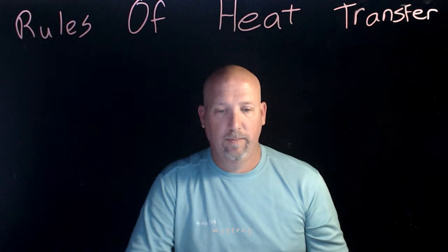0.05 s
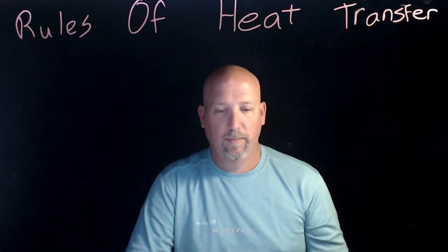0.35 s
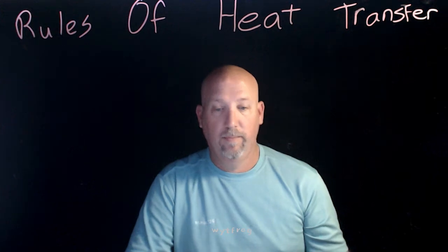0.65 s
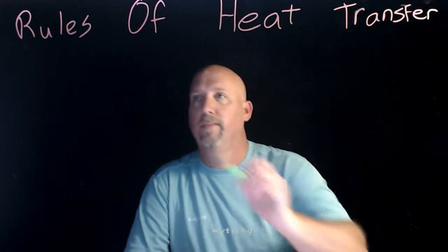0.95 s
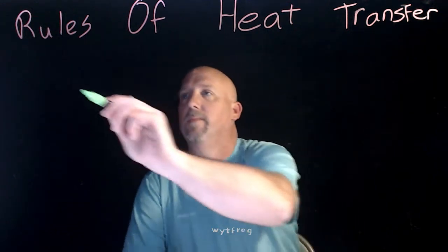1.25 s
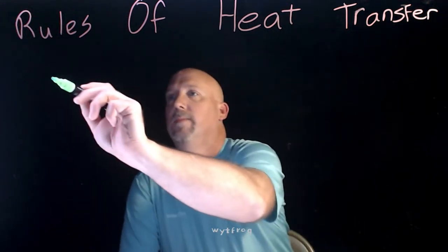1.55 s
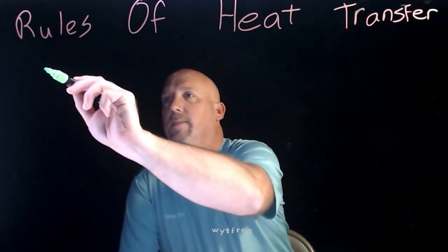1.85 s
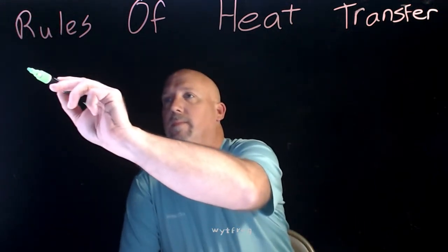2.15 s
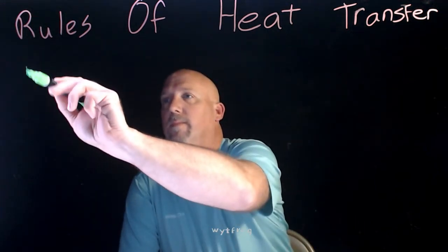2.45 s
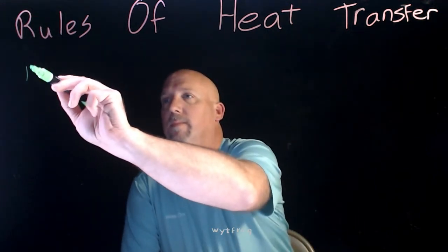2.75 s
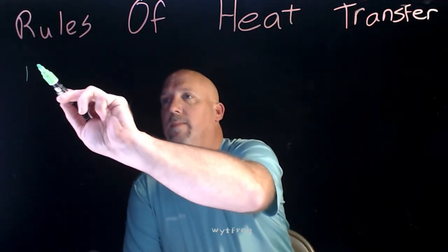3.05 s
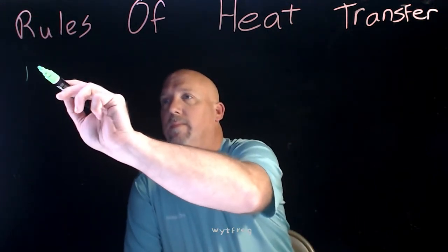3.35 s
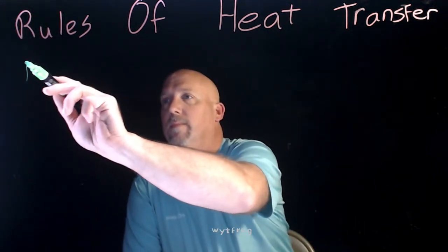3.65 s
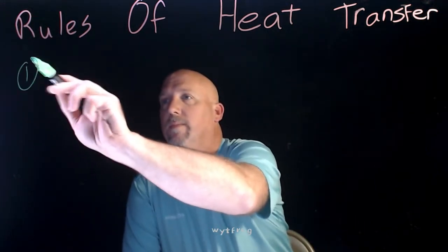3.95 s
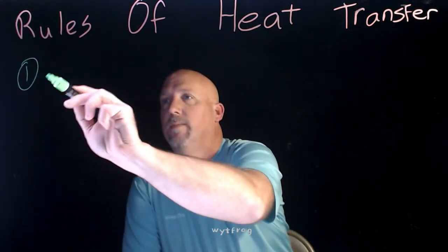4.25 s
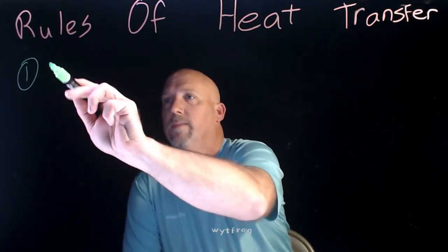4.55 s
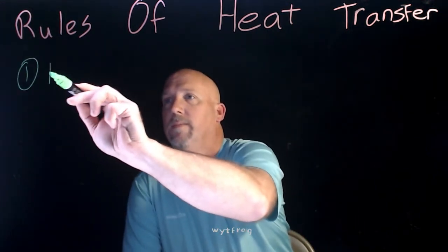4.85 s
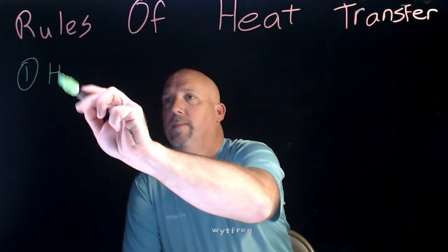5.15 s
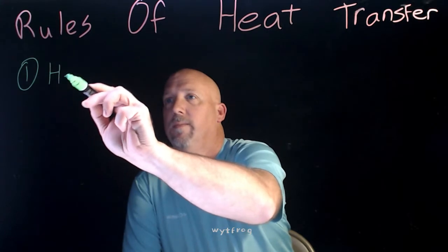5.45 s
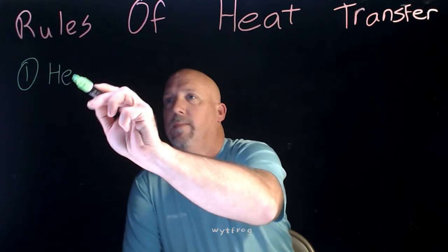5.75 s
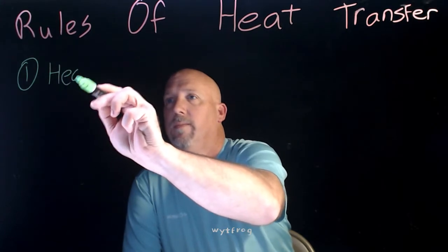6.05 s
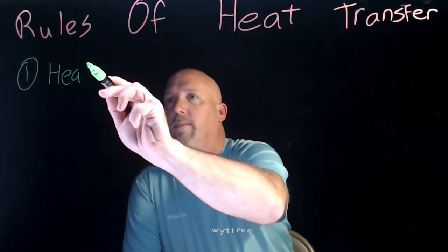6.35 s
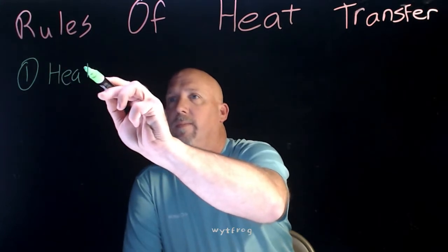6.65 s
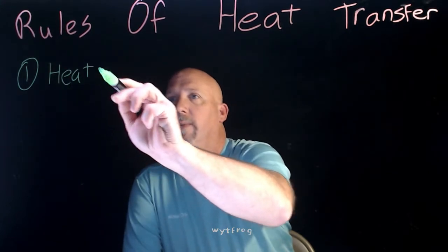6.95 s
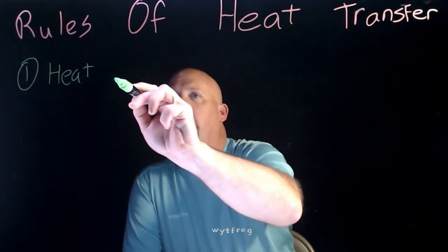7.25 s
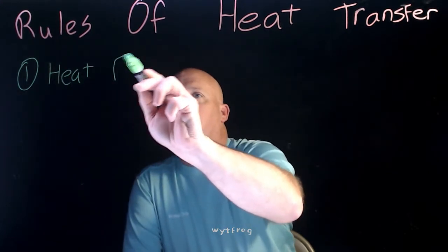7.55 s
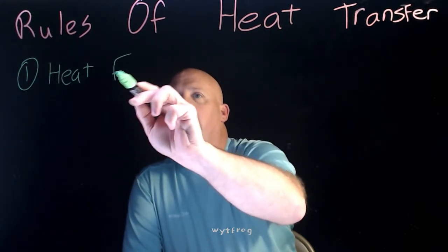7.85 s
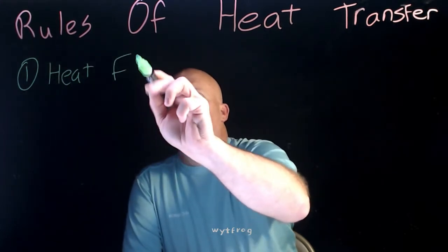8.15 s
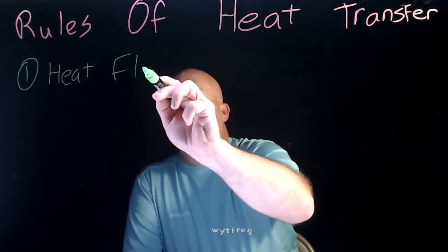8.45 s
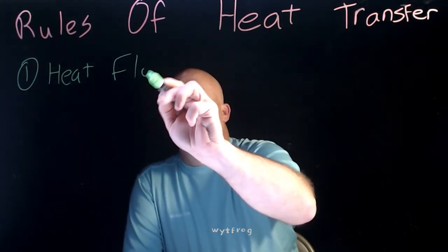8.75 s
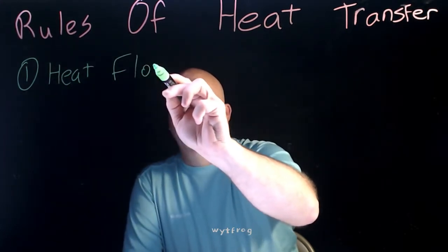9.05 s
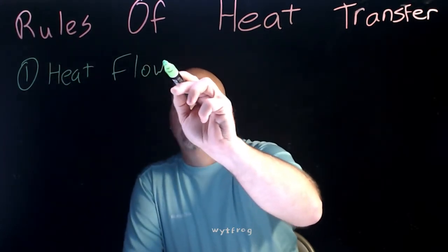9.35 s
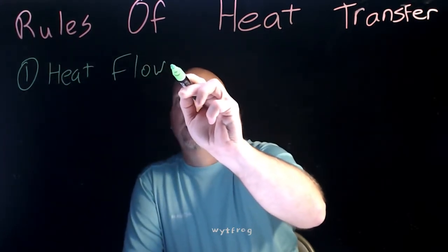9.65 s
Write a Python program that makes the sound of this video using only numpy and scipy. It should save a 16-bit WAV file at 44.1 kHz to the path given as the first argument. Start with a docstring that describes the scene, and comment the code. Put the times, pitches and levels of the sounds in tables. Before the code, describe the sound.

A marker writes on a big glass pane, heard up close in a small studio. First comes a low, soft bump against the board, then a knock and a few very short, high squeaks. A plastic cap drops with a hard clack and quickly rattles to rest. The felt tip then taps the glass about twice a second, squeaking briefly once more. A steady low hum and light hiss lie underneath.

```python
"""Marker on a glass board

In a small, dry studio with a mains hum, a hand bumps a large framed glass board and writes on it.
The felt tip lands with dull knocks that ring the pane, then sticks and slips in a few tiny squeaks.
Something small and plastic, probably the cap, falls and bounces.
A mild noise gate lifts the hiss after each loud sound."""
import sys
import numpy as np
from scipy import signal
from scipy.fft import rfft, irfft
from scipy.io import wavfile
from scipy.ndimage import uniform_filter1d

SR = 44100
rng = np.random.default_rng(int(sys.argv[2]) if len(sys.argv) > 2 else 0)


def wrap_up_sound(samples):
    """Save the sound to the file named by the first command line argument, as 16-bit audio."""
    columns = np.atleast_2d(samples).T
    # keep every value between -1 and 1, then stretch to whole-number steps
    tamed = np.clip(columns, -1, 1)
    steps = np.round(tamed * 32767).astype(np.int16)
    wavfile.write(sys.argv[1], SR, steps)


N = 436149
AGE = np.arange(SR) / SR  # time [s] within a one-second sound
HZ = np.fft.rfftfreq(SR, 1 / SR)


def amp(db):
    """Decibels to gain."""
    return 10 ** (np.asarray(db) / 20)


def unit(x):
    """Scales to an rms of one."""
    return x / np.sqrt(np.mean(x ** 2) + 1e-20)


def curve(points, hz):
    """Reads a breakpoint curve on a log-frequency axis."""
    freqs, values = np.transpose(points)
    return np.interp(np.log(hz + 1), np.log(freqs), values)


def add(mix, start, sound):
    """Drops a sound into the mix at a time in seconds."""
    part = mix[max(round(start * SR), 0):][:len(sound)]
    part += sound[:len(part)]


def decay(t60, age=AGE):
    """An envelope that falls 60 dB in t60 seconds."""
    return np.exp(-np.log(1000) * age / t60)


def mode(hz, db, t60):
    """One struck, dying sine."""
    return amp(db) * decay(t60) * np.sin(2 * np.pi * hz * AGE)


def band(hz, octaves):
    """One second of noise around a frequency."""
    bell = np.exp(-.5 * (np.log2((HZ + 1) / hz) / octaves) ** 2)
    return unit(irfft(rfft(rng.standard_normal(SR)) * bell))


def echoes(rows):
    """Frequency response of the direct sound plus a few delayed copies."""
    return 1 + sum(gain * np.exp(-2j * np.pi * HZ * delay) for delay, gain in rows)


def chirp(swell_ms, sag, wobble):
    """Envelope and phase (in turns per Hz) of a slip that swells, sags in pitch and dies."""
    age = AGE * 1000 / swell_ms
    envelope = (age * np.exp(1 - age)) ** 2
    bend = 1 + sag * (np.exp(1 - age) - 1) / 2 + wobble * band(510, 0.96)
    return envelope, np.cumsum(bend) / SR


def clatter(spectrum, rattle, rattle_s):
    """The sharpest click with this spectrum (minimum phase), then a quick, irregular chatter."""
    log_gain = np.log(np.r_[spectrum, spectrum[-2:0:-1]] + 1e-6)
    click = np.fft.ifft(np.exp(np.conj(signal.hilbert(log_gain)))).real
    chatter = rattle * rng.standard_normal(SR) * np.exp(-AGE / rattle_s)
    return (click + signal.fftconvolve(click, chatter)[:SR]) / abs(click).max()


def rub(length, db, hz, octaves):
    """One soft swell of friction noise."""
    swell = np.hanning(min(int(length * SR), SR))
    return amp(db) * swell * band(hz, octaves)[:len(swell)]


# colour of the room air: (frequency [Hz], relative level [dB])
AIR_COLOUR = [(25, -11), (48, -13), (68, -0.5), (170, 6), (300, -1), (500, -4.5), (630, -11.5), (900, -1.5),
              (1250, -0.5), (2000, -4), (4000, -12.5), (7800, -24.5), (12000, -25.5), (14300, -22),
              (16000, -28.5)]
# hum partials: (harmonic number, rms level [dB])
HUM_PARTIALS = [(2, -52.5), (3, -76.5), (4, -76), (5, -81.5), (6, -84), (15, -86.5)]


def room_tone(air_db=-60.5, mains_hz=60, waver=0.036):
    """A bed of ventilation hiss and slightly wavering mains hum."""
    t = np.arange(N) / SR
    colour = amp(curve(AIR_COLOUR, np.fft.rfftfreq(N, 1 / SR)))
    air = unit(irfft(rfft(rng.standard_normal(N)) * colour, N))
    hum = sum(np.sqrt(2) * amp(db) * np.sin(2 * np.pi * (round(k) * mains_hz * t + rng.random()))
              for k, db in HUM_PARTIALS)
    drift = unit(sum(np.sin(2 * np.pi * (hz * t + rng.random())) for hz in np.geomspace(.3, 4, 12)))
    return amp(air_db) * air + hum * (1 + waver * drift)


# bending modes of the pane: (frequency [Hz], level [dB], t60 [s], polarity)
PANE_MODES = [(86.6, -17.5, 0.12, 1), (127.2, -14, 0.15, 1), (178.5, -0.9, 0.059, -1),
              (223.4, -6, 0.059, 1), (275.8, 3, 0.04, 1), (370.3, -12, 0.097, -1), (435, 1, 0.027, -1),
              (474, -26.5, 0.13, -1), (542, -28, 0.14, -1), (607, -40, .08, 1), (783, -18, 0.082, 1)]
# slap from the frame and nearby surfaces: (delay [s], gain)
FRAME_RETURNS = [(.00798, 0.46), (.00928, 0.11), (.01794, -0.24), (.0227, -.036), (.0307, -0.13)]
# knocks on the pane, the first two from the hand as the bump begins, the rest where the tip lands: (time [s],
# force [dB], contact [ms], lean towards the low modes, tick level [dB])
LANDINGS = [(1.2975, -22.5, 0.3, -0.1, -55), (1.302, -20, 0.78, -0.5, -56.5),
            (2.347, -11.5, 0.79, -1.2, -46), (3.6431, -18, .3, 2.2, -58), (3.665, -26.5, 0.26, 1.5, -48),
            (4.5333, -19, 0.68, -2, -55), (4.8339, -10, 0.47, -0.25, -42), (5.0836, -10.5, 0.29, 0.7, -41),
            (5.3759, -11, 0.74, -1.4, -51), (5.8864, -11.5, 0.7, -0.6, -50), (6.4426, -6.5, 0.44, 0.8, -46),
            (6.7363, -6.5, .54, 0.16, -35.5), (7.2908, -17.5, 0.38, 0.55, -45),
            (7.7763, -6.5, 0.22, 1.26, -18), (8.106, -10, 0.12, 1.63, -38.5),
            (8.5682, -39.5, 0.97, 2.5, -70), (9.0543, -11.5, 0.16, 1.63, -42)]


def pane_knocks(cancel_hz=60, felt_hz=700, pre_roll_s=.01):
    """The hand, then the felt tip, pushes the pane; a longer contact leaves the high modes quiet."""
    out = np.zeros(N)
    z = 1j * HZ / cancel_hz
    low_cut = z ** 2 / (z ** 2 + np.sqrt(2) * z + 1)  # the pane's front and back cancel in the deep bass
    felt = 1 / np.sqrt(1 + (HZ / felt_hz) ** 8)  # the soft nib rolls off the top
    colour = low_cut * felt * echoes(FRAME_RETURNS)
    for time, db, contact_ms, lean, _ in LANDINGS:
        # where the pane is struck decides how strongly the low modes speak
        ring = sum(np.sign(polarity) * (max(hz, 190) / 250) ** -lean * mode(hz, level, t60)
                   for hz, level, t60, polarity in PANE_MODES)
        push = np.exp(-.5 * (2 * np.pi * HZ * contact_ms / 1000) ** 2 - 2j * np.pi * HZ * pre_roll_s)
        add(out, time - pre_roll_s, amp(db) * irfft(rfft(ring) * push * colour))
    return out


# colour of the barrel's tick: (frequency [Hz], level [dB])
TICK_COLOUR = [(300, -17), (720, -11.5), (860, -0.5), (1250, -1.5), (1600, -20), (1950, -4.5), (2350, -6),
               (2800, -41), (3700, -30), (4200, -16.5), (5600, -20.5), (6500, -53.5), (17000, -60.5)]


def marker_ticks(chirp_hz=5385, chirp_db=-13):
    """The top layer of each knock: a tick (the barrel's, when the tip lands) and a brief high chirp."""
    out = np.zeros(N)
    colour = amp(curve(TICK_COLOUR, HZ))
    for time, *_, tick_db in LANDINGS:
        swell, turns = chirp(swell_ms=1.4, sag=0.015, wobble=0.01)
        add(out, time, amp(tick_db) * clatter(colour, rattle=0.03, rattle_s=0.0031))
        add(out, time, amp(tick_db + chirp_db) * swell * np.sin(2 * np.pi * chirp_hz * turns))
    return out


# the whole board swaying in its stand: (frequency [Hz], level [dB], t60 [s])
STAND_MODES = [(63, -36.5, 0.66), (96, -15.5, 0.136), (146, -41.5, 0.89), (184, -4.5, 0.11),
               (303, -18.5, 0.088), (379, -22.5, 0.1)]
# skin on glass: (length [s], level [dB], centre [Hz], width [octaves])
HAND_RUBS = [(.04, -45.5, 680, 0.44), (.074, -69, 5000, 0.7)]


def hand_bump(time=1.3055, attack_s=0.0059, rub_lag_s=.008):
    """A soft, slow blow sets the board and its stand booming, and the hand rubs the glass."""
    out = np.zeros(N)
    boom = sum(mode(*row) for row in STAND_MODES)
    add(out, time, boom * (1 - np.exp(-AGE / attack_s)))
    for length, db, hz, octaves in HAND_RUBS:
        add(out, time + rub_lag_s - length / 2, rub(length, db, hz, octaves))
    return out


# light brushes: (peak time [s], length [s], level [dB], centre [Hz], width [octaves])
SOFT_RUBS = [(2.974, 0.075, -63, 7500, 2.1), (3.388, 0.019, -56.5, 2330, .66),
             (3.979, .11, -52.5, 280, 0.454), (7.071, 0.12, -64.5, 3500, 0.55),
             (9.3, 0.54, -67, 212, 0.091)]


def brushes():
    """Nib and sleeve rub softly between the strokes."""
    out = np.zeros(N)
    for time, length, db, hz, octaves in SOFT_RUBS:
        add(out, time - length / 2, rub(length, db, hz, octaves))
    return out


# nib resonances stirred by a gritty slip: (frequency [Hz], level [dB])
NIB_MODES = [(1950, 3.5), (2550, -1), (3400, -7.5), (4600, -21), (6250, -22)]
# stick-slip squeaks, with grit and thud relative to the tone; the row at 7.001 s is a strong wall echo of the
# squeak at 6.99 s: (time [s], level [dB], pitch [Hz], swell [ms], overtone [Hz], grit [dB], thud [dB])
SLIPS = [(3.0707, -18, 2635, 2, 14940, -32, -14.5), (3.1640, -15.5, 2850, 3.1, 3800, -10, -32),
         (3.175, -16, 1710, 1.1, 7300, -9.5, -19.5), (3.1781, -13, 2190, 0.98, 4580, -13, -18),
         (6.4416, -34.5, 2700, 1.2, 5950, -19, -20), (6.7362, -41, 5990, 1.4, 2700, -24, -22),
         (6.9375, -49, 15400, .83, 11200, -20, -27), (6.944, -39.5, 4650, 1.6, 8200, -24, -27),
         (6.973, -39.5, 5150, 2.3, 8800, -5, -32), (6.9903, -17, 2430, 1.4, 8860, -12, -48),
         (6.9926, -21.5, 3620, 1.2, 9800, -12, -44), (7.001, -26.5, 3300, 2.3, 1970, -8, -43),
         (7.043, -38.5, 565, 1.54, 1090, -20, -26)]


def nib_squeaks(overtone_db=-19, hiss_db=-4):
    """The nib slips for a few milliseconds: an unsteady tone and overtone, grit and a small thud; one row
    replays a squeak as its wall echo."""
    out = np.zeros(N)
    for time, db, hz, swell_ms, overtone_hz, grit_db, thud_db in SLIPS:
        swell, turns = chirp(swell_ms, sag=0.033, wobble=0.013)
        phase = 2 * np.pi * turns
        tone = np.sin(hz * phase) + amp(overtone_db) * np.sin(overtone_hz * phase)
        nib_ring = sum(amp(level) * np.sin(nib_hz * phase) for nib_hz, level in NIB_MODES)
        grit = amp(hiss_db) * band(hz, octaves=0.38) + nib_ring
        thud = band(690, octaves=1.1)
        add(out, time, amp(db) * swell * (tone + amp(grit_db) * grit + amp(thud_db) * thud))
    return out


# colour of a clack: (frequency [Hz], level [dB])
CLACK_COLOUR = [(40, -46), (150, -10), (500, -14), (1000, 0), (1400, 7.5), (2000, -2.5), (3600, -12.5),
                (4500, -18), (7500, -33), (10500, -21), (12500, -27.5), (17000, -34.5)]
# ring of the cap: (frequency [Hz], level [dB], t60 [s])
CAP_MODES = [(788, -48, .21), (937, -47.5, .22), (1040, -39, 0.37), (1411, -41, .24), (1624, -37.5, .22),
             (2244, -42, .18), (5870, -44, 0.0613)]
# faint boom and wash after each bounce: (centre [Hz], width [octaves], level [dB], t60 [s])
BOUNCE_TAILS = [(124, 0.16, -43.5, 1.4), (2990, 0.91, -62, 2)]
# the cap hits: (time [s], level [dB])
BOUNCES = [(3.5731, -8), (3.5765, -1.5), (3.579, -13.5), (3.5831, -20), (3.607, -16), (3.6194, -25),
           (3.6652, -9), (3.761, -27.5), (3.7726, -26)]


def cap_bounces(bright_hz=13500, dulling_hz_per_s=53000):
    """Hard plastic clacks with a faint ring and wash, duller and more rattly as the cap settles."""
    out = np.zeros(N)
    ring = sum(mode(*row) for row in CAP_MODES)
    for time, db in BOUNCES:
        cutoff_hz = max(bright_hz - dulling_hz_per_s * (time - BOUNCES[0][0]), 2000)
        colour = amp(curve(CLACK_COLOUR, HZ)) / np.sqrt(1 + (HZ / cutoff_hz) ** 12)
        click = clatter(colour, rattle=0.067 * (bright_hz / cutoff_hz) ** 0.52, rattle_s=.004)
        wash = sum(amp(level) * band(hz, octaves) * decay(t60)
                   for hz, octaves, level, t60 in BOUNCE_TAILS)
        add(out, time, amp(db) * (click + ring + wash))
    return out


# early reflections off the walls: (delay [s], relative gain)
REFLECTIONS = [(.0023, 0.37), (.0093, 0.046), (0.0116, .16), (0.0167, 0.042)]
# reverb time: (frequency [Hz], t60 [s])
REVERB_TIMES = [(200, 0.51), (1300, 0.19), (3000, .17), (8000, 0.059), (16000, 0.047)]


def studio(x, early_db, wet_db):
    """A few close reflections, then a short tail whose treble dies first."""
    scatter = rng.choice([-1., 1.], SR) * (rng.random(SR) < .12) * (AGE > .006)
    hz, t, spectra = signal.stft(scatter, SR, nperseg=256)
    fade = decay(curve(REVERB_TIMES, hz)[:, None], t)
    tail = signal.istft(spectra * fade, SR, nperseg=256)[1][:SR]
    early = irfft(echoes([(delay, amp(early_db) * gain) for delay, gain in REFLECTIONS]))
    return signal.fftconvolve(x, early + amp(wet_db) * tail / np.linalg.norm(tail))[:N]


def scene():
    """The mono mix: board dry, marker close, cap farthest and wettest, all over the room tone."""
    ticks = studio(marker_ticks(), early_db=-3, wet_db=-22)
    squeaks = studio(nib_squeaks(), early_db=-1, wet_db=-17.5)
    cap = studio(cap_bounces(), early_db=-8, wet_db=-11.5)
    return (pane_knocks() + ticks + hand_bump() + brushes() + squeaks + cap + room_tone())[None]


def record(dry, threshold_db=-39, range_db=3, half_shut_s=0.36, release_s=.14):
    """A mild gate opens on loud sounds, holds and eases shut; filters trim rumble and extreme top."""
    loud = uniform_filter1d(dry[0] ** 2, size=256) > amp(threshold_db) ** 2
    t = np.arange(N) / SR
    since_loud = t - np.maximum.accumulate(np.where(loud, t, -10))
    shut = np.clip((since_loud - half_shut_s) / release_s + .5, 0, 1)
    gated = dry * amp(-range_db * shut)
    low_cut = signal.butter(3, 48, "highpass", fs=SR, output="sos")
    high_cut = signal.firwin(511, 15900, window=("kaiser", 9), fs=SR)
    cleaned = signal.sosfiltfilt(low_cut, gated, padtype="even")
    return signal.oaconvolve(cleaned, high_cut[None], "same")


dry = scene()
out = record(dry)
wrap_up_sound(out)
```